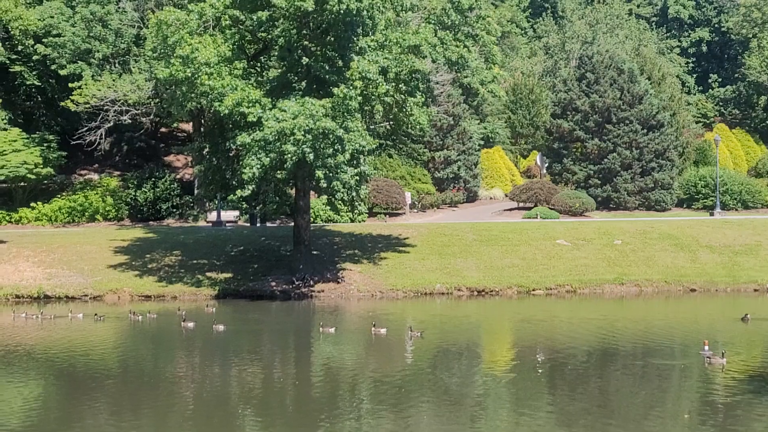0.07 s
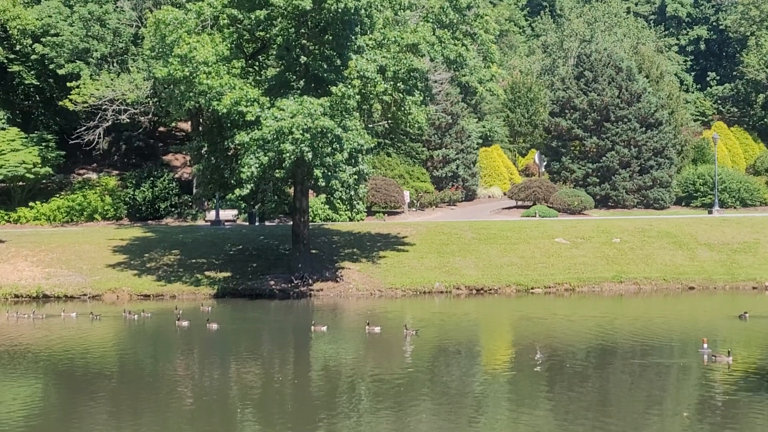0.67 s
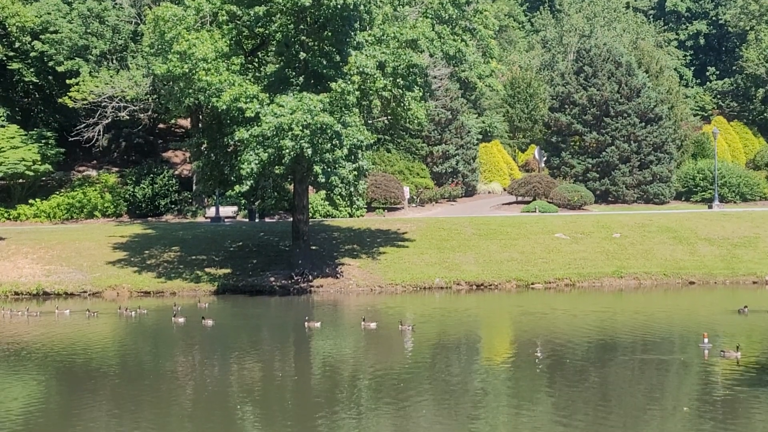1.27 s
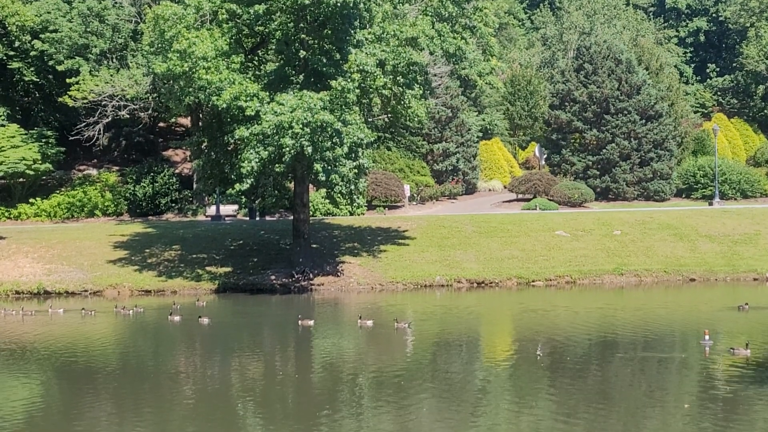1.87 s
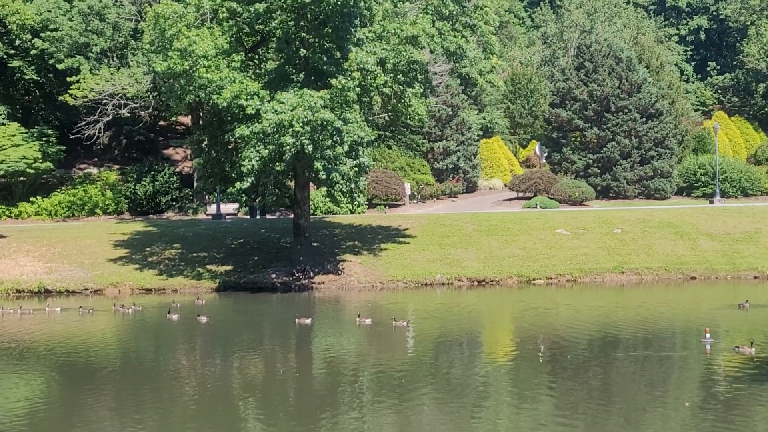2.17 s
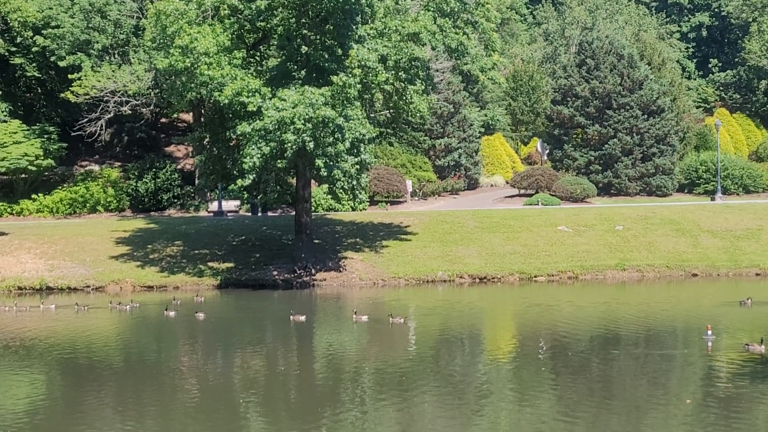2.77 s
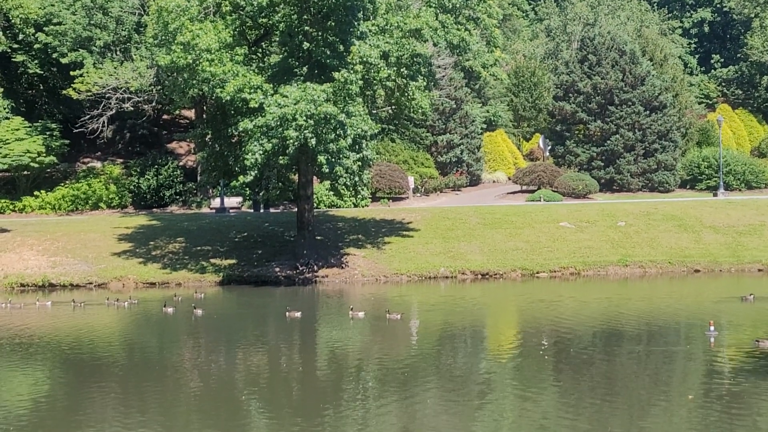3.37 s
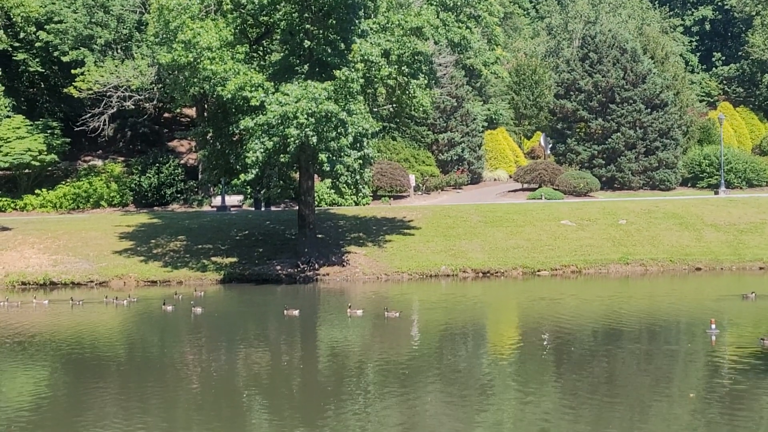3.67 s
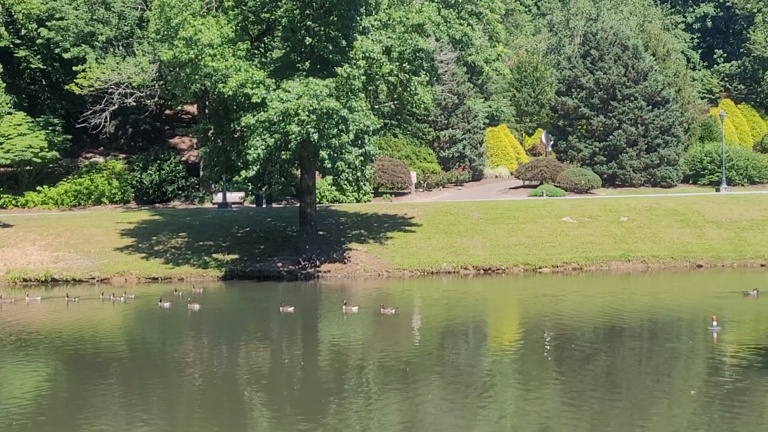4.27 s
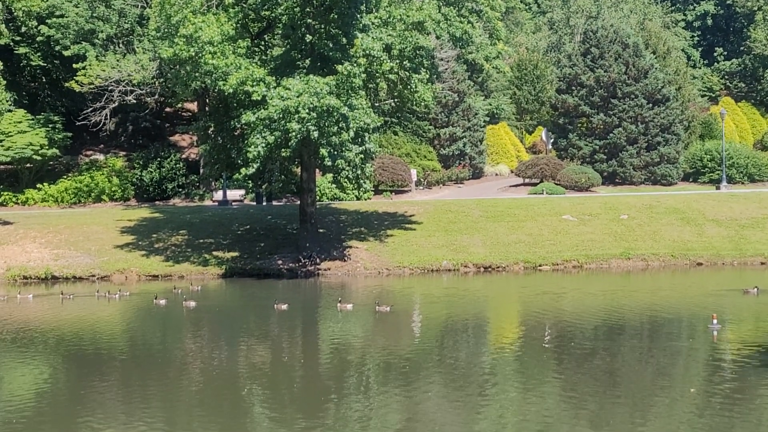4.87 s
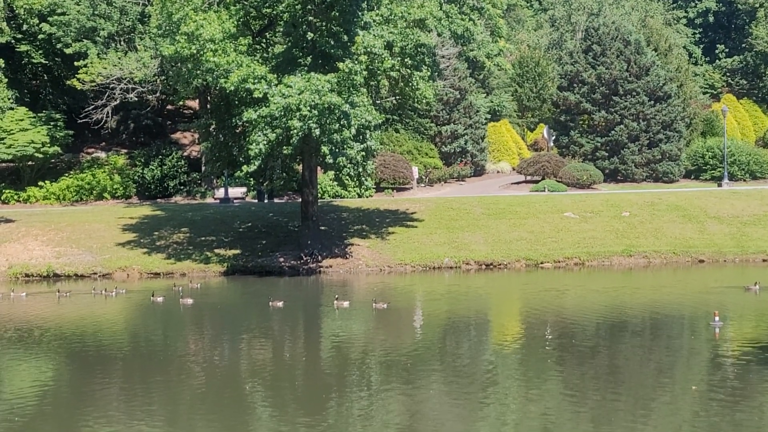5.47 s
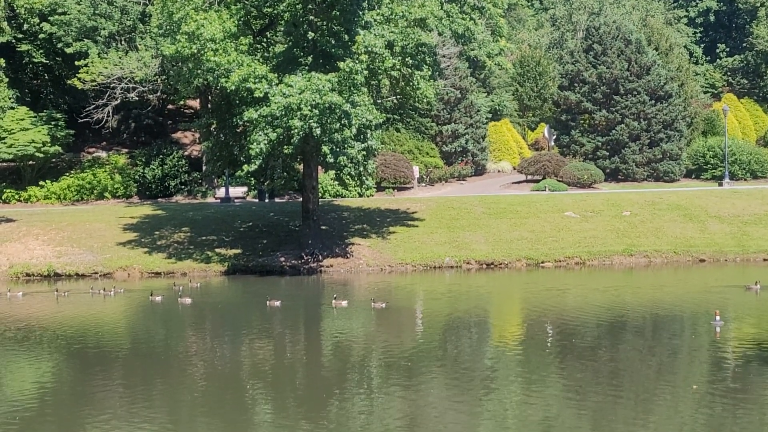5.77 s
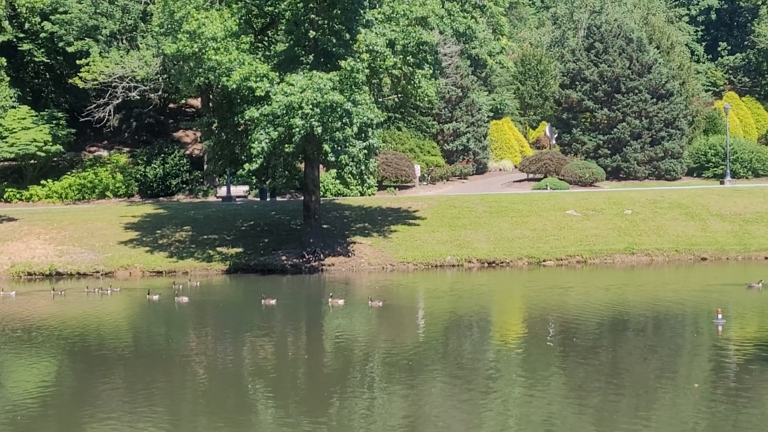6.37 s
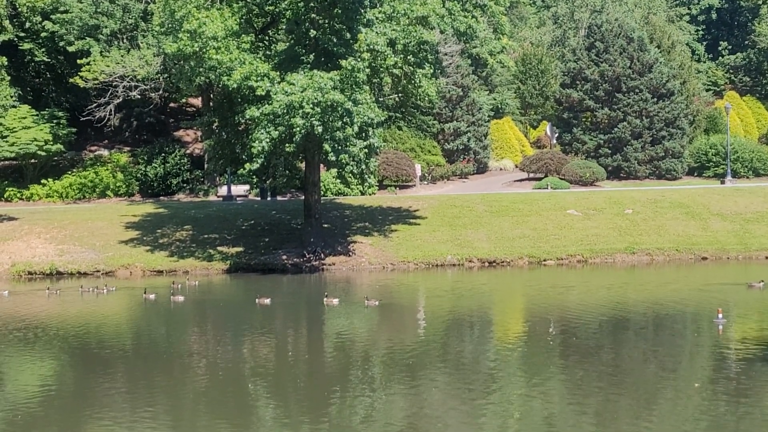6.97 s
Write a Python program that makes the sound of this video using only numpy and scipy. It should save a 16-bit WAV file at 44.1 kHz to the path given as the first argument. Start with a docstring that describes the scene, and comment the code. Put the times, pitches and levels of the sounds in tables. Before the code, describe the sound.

A steady wash of distant traffic, low rumble and faint leaf hiss fills an open park. Almost at once a far-off engine opens up, its bassy exhaust rising with an uneven lope. The pitch drops as it changes gear, lifts slightly again, and the drone dies into a soft burble that fades, leaving the background. The microphone is far from the road, with the sound leaning slightly right.

```python
"""Beside a park pond, a V8 vehicle accelerates on a road beyond the trees. Its exhaust drones upward,
drops at a gear change, pulls again, then burbles away off the throttle. The drone is the harmonics
of the firing rate, unequal cylinders add a lope between them, and uneven firings ring the pipe.
Under it lie town rumble, a steady wash of far traffic and a soft hiss of leaves, a little to the right."""
import sys
import numpy as np
from scipy import signal
from scipy.fft import rfft, irfft, next_fast_len
from scipy.io import wavfile
from scipy.ndimage import uniform_filter1d, map_coordinates

SR = 44100
rng = np.random.default_rng(int(sys.argv[2]) if len(sys.argv) > 2 else 0)


def persist_wave(psi):
    """Save psi, clipped to +-1, as 16-bit WAV."""
    counts = np.round(np.clip(psi, -1, 1) * 32767).astype(np.int16)
    wavfile.write(sys.argv[1], SR, np.atleast_2d(counts).T)


N = 313551

FLOORED_S, EASE_OFF_S, LIFT_S = .52, 5.37, 5.68  # the driver's throttle moves
OPEN_S, CLOSE_S = .07, .31  # fade lengths as the throttle opens and closes

# The revs. Each row: time in seconds, firing rate in Hz.
REVS = [(0.5, 75.9), (1.02, 79.2), (1.45, 86.16), (2.25, 96.0), (2.55, 96.24), (3.15, 94.8), (3.5, 91.64),
        (3.98, 83.55), (4.25, 81.36), (4.75, 84.4), (5.25, 85.54), (5.7, 82.23)]
# The exhaust's fader ride. Each row: time in seconds, level in dB over cruising.
EXHAUST_RIDE = [(.27, 0.5), (.38, 3.5), (.68, 6), (.92, 10.5), (1.14, 9), (1.4, 4), (1.85, -3.5), (2.5, 1),
                (2.78, -4.5), (3.03, 0), (3.6, -5), (4.1, -1), (4.4, -0.5), (4.62, 2), (4.9, -3.5),
                (5.45, -10.5), (6, -15.5), (6.6, -26)]
def vehicle():
    """The far exhaust in three layers: only its bass carries through the trees."""
    firing_hz, = curves(REVS)
    effort_db, = curves(EXHAUST_RIDE)
    firings = np.cumsum(firing_hz) / SR
    light_throttle = fade_out(FLOORED_S, OPEN_S)
    overrun = 1 - fade_out(EASE_OFF_S, CLOSE_S)
    booming = np.exp(-((firing_hz - 85.55) / 3.3) ** 2)  # the lope booms in a narrow band of revs
    lope_db = -48 + .49 * effort_db + 5 * light_throttle + 7 * booming
    lope_fade = fade_out(6.07, CLOSE_S)  # outlasts the drone a little
    burble_db = -44.5 + .46 * effort_db - 17 * light_throttle + 2 * overrun
    return (drone(firings, firing_hz, effort_db, light_throttle)
            + amp(lope_db) * lope_fade * lope(firings, firing_hz)
            + amp(burble_db) * burble(firings))


# The EQ of pipe and path that the harmonics glide through. Each row: frequency in Hz, gain in dB.
PATH_EQ = [(76, 2), (81, -4), (88, -3), (95, -1), (227, -12), (242, -3), (251, -2), (266, -9.5), (287, 0.5),
           (310, -5), (346, -6.5), (368, -21), (393, -13.5), (418, -27.5)]
# The second harmonic swells and fades on its own. Each row: time in seconds, level in dB.
SECOND_HARMONIC = [(.5, -54), (.68, -46), (1.15, -49), (1.35, -44.5), (1.72, -44), (1.92, -51),
                   (2.1, -46.5), (2.45, -45.5), (2.95, -51), (3.25, -66), (3.58, -45.5), (3.83, -52.5),
                   (4, -42), (4.48, -40.5), (4.7, -46), (5.1, -45.5), (5.55, -51)]
# A faint rasp on top. Each row: multiple of the firing rate, level in dB against the fifth harmonic.
RASP_OVERTONES = [(6, -10), (7, -22), (9, -16.5)]
def drone(firings, firing_hz, effort_db, light_throttle):
    """The clean harmonics of the firing rate, the lowest steadiest; they die as the throttle closes."""
    harmonic_db = [-40 + effort_db + along(PATH_EQ, k * firing_hz) for k in range(1, 6)]
    harmonic_db[0] -= 7 * light_throttle  # thinner bass until the throttle opens
    harmonic_db[1], = curves(SECOND_HARMONIC)
    body = sum(amp(db) * partial(firings, k, flutter_db=.6 * k, smear_rad=.035 * k)
               for k, db in enumerate(harmonic_db, 1))
    rasp = sum(amp(db) * partial(firings, k, flutter_db=2.5, smear_rad=.15) for k, db in RASP_OVERTONES)
    return fade_out(LIFT_S, CLOSE_S) * (body + amp(harmonic_db[-1]) * rasp)


# The tones of the lope. Each row: multiple of the firing rate, relative level in dB.
LOPE_TONES = [(.625, -18.5), (.75, -10), (1.123, -12.5), (1.5, -2), (2.125, -12), (2.5, -12), (3.252, -10),
              (3.5, 2), (3.749, -11.5), (4.5, -11.5), (5.5, -23.5)]
# The pipe's peaks and dips that those tones cross. Each row: frequency in Hz, gain in dB.
LOPE_EQ = [(95, -6), (112, -13.5), (122, -5), (135, 4), (148, -1.5), (228, -2), (245, 15.5), (265, -5.5),
           (292, -2), (335, 1.5), (385, -5.5)]
def lope(firings, firing_hz):
    """Unequal cylinders repeat every eight firings and put wavering tones between the harmonics."""
    return unit(sum(amp(db + along(LOPE_EQ, k * firing_hz))
                    * partial(firings, k, flutter_db=2.2, smear_rad=.1) for k, db in LOPE_TONES))


def partial(firings, multiple, flutter_db, smear_rad):
    """One engine tone; reflections on the way make its level and phase waver."""
    phase = 2 * np.pi * (multiple * firings + rng.random()) + smear_rad * wobble(12)
    return np.sqrt(2) * np.sin(phase) * amp(flutter_db * wobble(18))


# The muffled pipe's resonances. Each row: centre in Hz, width of one filter stage in Hz, gain in dB.
PIPE_RESONANCES = [(60.2, 32.5, -0.5), (85.5, 47, -2), (249.5, 27.8, 1), (303.7, 82, -3.5)]
def burble(firings):
    """Each firing is a little stronger or weaker by chance, and rings the exhaust pipe."""
    def pipe(hz):  # two band-pass stages per resonance give steep sides
        return sum(amp(db) * (1j * hz * width / (centre ** 2 - hz ** 2 + 1j * hz * width)) ** 2
                   for centre, width, db in PIPE_RESONANCES)
    when = np.flatnonzero(np.diff(np.floor(firings)))
    excess = np.tanh(rng.standard_normal(len(when)) / .25)  # a cylinder can stray only so far
    return unit(filtered(np.bincount(when, excess, N), pipe))


# The bed's fader rides. Each row: time in seconds, traffic in dB, leaves in dB, both before the trim.
BED_RIDE = [(0.35, -49.5, -68.5), (0.52, -48.5, -67), (1.43, -48.5, -65.5), (3.76, -50, -67),
            (5.22, -50, -67.5), (6.08, -52, -66.5), (6.97, -52.5, -66.5), (7.05, -52.5, -65.5)]
# The tone of rumble, traffic and leaves. Each row: frequency in Hz, relative level in dB.
RUMBLE_EQ = [(15, -45), (28, -20), (50, -3), (80, -6), (160, -13.5), (210, -17), (290, -6), (420, -17.5),
             (700, -35), (1500, -87.5)]
TRAFFIC_EQ = [(100, -25), (350, -6), (520, -8), (800, 0.5), (1100, -1), (1600, -5), (2100, -7),
              (2400, -13.5), (2700, -14), (3100, -26.5), (5000, -41), (9000, -93.5)]
LEAVES_EQ = [(1000, -31.5), (2800, -4), (3600, 2.5), (4300, 1.5), (4800, -1.5), (6000, -3.5), (7500, -6),
             (8500, -17.5), (9900, -18), (10400, -25), (15000, -46)]
def surroundings(trim_db=3):
    """The background bed: town rumble, tyres on far roads and a light breeze in the trees."""
    traffic_db, leaves_db = curves(BED_RIDE)
    lean_right = amp([[-.7], [.7]])
    rumble = amp(-50) * rush(RUMBLE_EQ, patchy_db=1.0) * lean_right
    tyres = amp(traffic_db + trim_db) * rush(TRAFFIC_EQ, patchy_db=.54)
    leaves = amp(leaves_db + trim_db) * rush(LEAVES_EQ, patchy_db=1.2)
    return rumble + tyres + leaves


# The bed's stereo image. Each row: frequency in Hz, left-right likeness (1 is mono, 0 is wide).
STEREO_LIKENESS = [(30, .85), (70, 0.96), (350, 0.98), (600, 0.42), (850, .45), (1100, 0.018), (1600, 0.22),
                   (2800, 0.27), (3400, 0.41), (4600, 0.4), (6000, .35), (10000, 0.17)]
def rush(eq, patchy_db):
    """Shaped stereo noise of rms 1 that flickers in small patches of pitch and time."""
    def mid_side_eq(hz):
        spread = np.arccos(along(STEREO_LIKENESS, hz)) / 2
        return amp(along(eq, hz)) * [np.cos(spread), np.sin(spread)]
    bands = signal.stft(rng.standard_normal((2, N)), nperseg=512)[2]
    patches = uniform_filter1d(rng.standard_normal(bands.shape[1:]), size=6, axis=0)
    patches = uniform_filter1d(patches, size=16, axis=1)
    noise = signal.istft(bands * amp(patchy_db * unit(patches)), nperseg=512)[1][:, :N]
    mid, side = filtered(noise, mid_side_eq)
    return unit(np.array([mid + side, mid - side]))


def amp(db):
    """Decibels to gain."""
    return 10 ** (np.asarray(db) / 20)


def unit(x):
    """Scale to rms 1."""
    return x / np.sqrt(np.mean(x ** 2) + 1e-20)


def along(points, hz):
    """Read (Hz, value) points on a log frequency axis."""
    f, v = np.transpose(points)
    return np.interp(np.log(hz + 1), np.log(f + 1), v)


def curves(rows):
    """One automation curve for each column after the time."""
    times, *columns = np.transpose(rows)
    return [np.interp(np.arange(N) / SR, times, column) for column in columns]


def fade_out(at_s, length_s):
    """A straight fade from 1 to 0, centred on a moment."""
    return np.clip((at_s - np.arange(N) / SR) / length_s + .5, 0, 1)


def wobble(rate):
    """A smooth random curve, rate knots a second."""
    return map_coordinates(rng.standard_normal(int(N * rate / SR) + 4), [np.arange(N) * rate / SR])


def filtered(x, response):
    """Pass x through a complex frequency response."""
    size = next_fast_len(N + SR // 2)
    return irfft(rfft(x, size) * response(np.fft.rfftfreq(size, 1 / SR)), size)[..., :N]


# The pan of the whole mix. Each row: frequency in Hz, left minus right in dB.
PAN = [(60, -1.3), (300, -1.5), (700, -3.5), (1200, -4.5), (1700, -6), (2900, -9), (3500, -1), (4400, -3.5),
       (5200, -8), (7400, -18), (8600, -4.5), (10500, 1)]
# The left channel's late arrival. Each row: frequency in Hz, delay in milliseconds.
LEFT_DELAY = [(100, .32), (300, .23), (600, .06), (900, .08), (1300, .32)]
def scene():
    """Vehicle and bed together; coming from the right, they reach the left later and mostly weaker."""
    def from_right(hz):
        gains = amp(np.outer([.5, -.5], along(PAN, hz)))
        delay = np.exp(-2j * np.pi * np.outer([1, 0], hz * along(LEFT_DELAY, hz) / 1000))
        return delay * gains / np.sqrt(np.mean(gains ** 2, axis=0))
    return filtered(vehicle() + surroundings(), from_right)


def record(dry, start_s=.241, top_hz=15800):
    """The master: a short silence, then the mix cuts in with faint hiss and its very top removed."""
    hiss = amp(-79.5) * rng.standard_normal((2, N))
    fade_in = np.clip((np.arange(N) / SR - start_s) / .004, 0, 1)
    return filtered((dry + hiss) * fade_in, lambda hz: hz < top_hz)


dry = scene()
out = record(dry)
persist_wave(out)
```